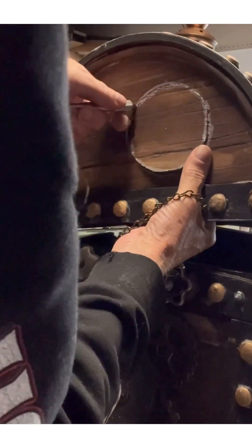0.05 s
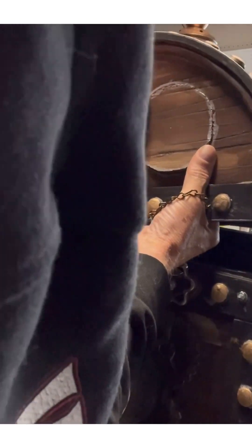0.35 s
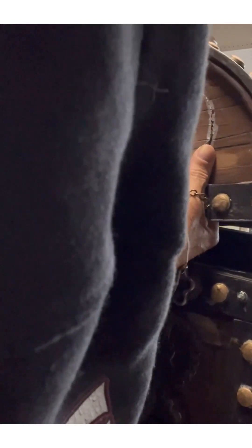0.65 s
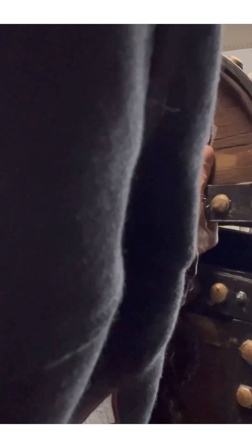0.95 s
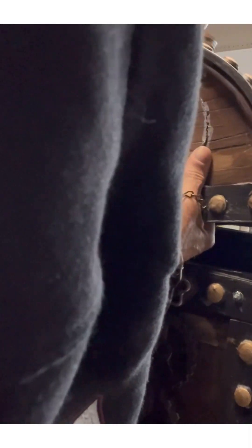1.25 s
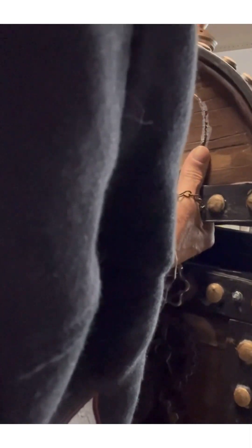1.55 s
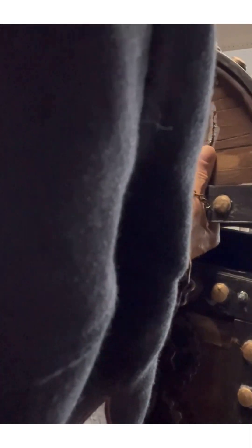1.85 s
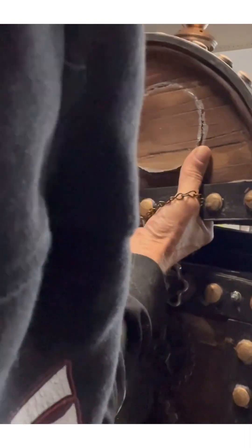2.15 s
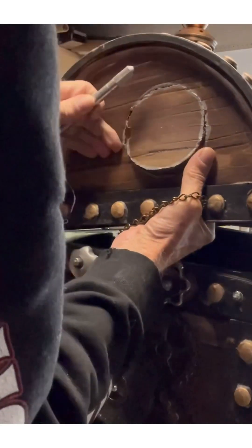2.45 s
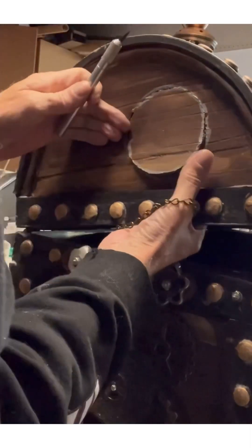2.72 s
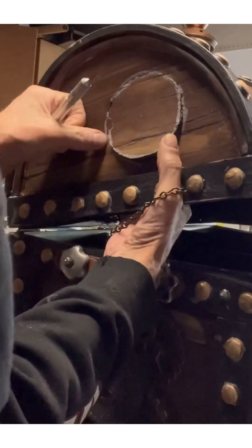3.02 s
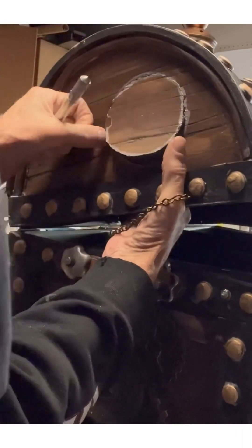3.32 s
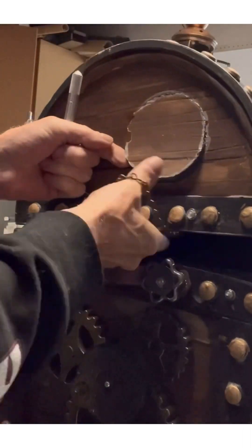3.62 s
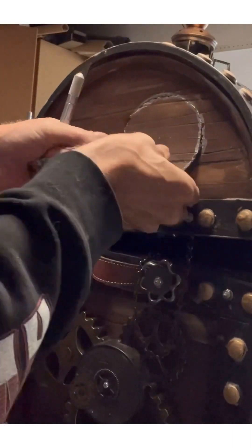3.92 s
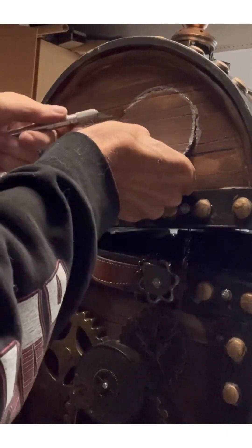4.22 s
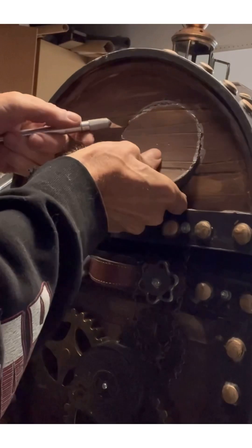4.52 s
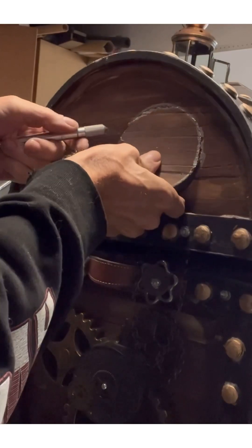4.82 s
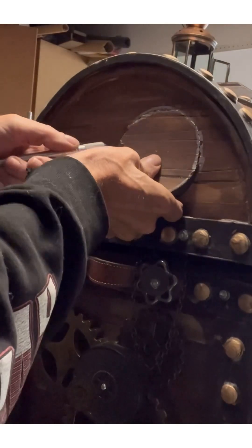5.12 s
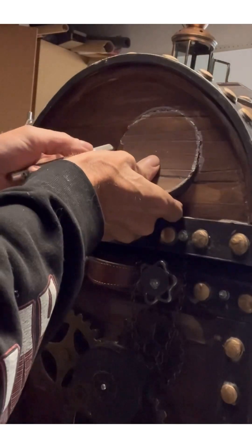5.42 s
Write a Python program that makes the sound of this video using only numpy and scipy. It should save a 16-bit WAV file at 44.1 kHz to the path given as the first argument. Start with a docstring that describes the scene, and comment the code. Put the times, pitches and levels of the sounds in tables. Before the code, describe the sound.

Close up in a quiet workshop, a steel point picks paint off a hollow prop with short, irregular scratches, crackly ticks and light knocks. The scraping pauses while a sleeve rustles and hands shift and bump on the surface, making two hard clacks. A small chain clinks and rattles briefly, then sparser ticks and scrapes resume. Very faint, high, falling squeaks pass twice in the background.

```python
"""Picking paint off a hollow prop

Close up in a quiet workshop, a steel point knocks, flicks off chips and drags in short strokes.
Blows and stick-slip ring the prop's modes; paint flakes crackle. A sleeve rustles, fingertips groan,
the grip shifts with two hard clacks and the links of a small chain collide.
Faint, high, falling squeaks come round twice."""
import sys
import numpy as np
from scipy import signal
from scipy.fft import rfft, irfft
from scipy.io import wavfile

SR = 44100
rng = np.random.default_rng(int(sys.argv[2]) if len(sys.argv) > 2 else 0)


def master(y):
    """Save y as 16-bit WAV."""
    cut = np.clip(np.atleast_2d(y).T, -1, 1)
    pcm = np.round(cut * 32767)  # scale
    wavfile.write(sys.argv[1], SR, pcm.astype(np.int16))


N = 249606
TIME_S = np.arange(N) / SR

# point catching on paint: t/s, body/dB, crack/dB
TICKS = [(0.0441, -53, -63), (0.0595, -46.5, -60), (0.267, -54.5, -82), (0.444, -74, -103),
         (0.639, -44, -54.5), (0.902, -47, -60.5), (1.184, -56.5, -69), (1.421, -78, -89),
         (2.0124, -45, -58.5), (2.116, -63, -114), (2.188, -68, -90), (2.288, -56.5, -68),
         (2.3083, -54, -62.5), (2.455, -59.5, -71), (2.6171, -36, -50.5), (2.641, -50.5, -60),
         (2.927, -62, -82), (3.083, -58.5, -67), (3.4559, -53, -65), (3.7255, -46, -63),
         (3.973, -62, -72.5), (4.0397, -56.5, -75), (4.1397, -58, -71), (4.433, -58, -77),
         (4.5427, -56, -83), (4.6447, -58, -66), (4.712, -64.5, -79), (4.7918, -61.5, -75.5),
         (4.9048, -64, -85.5), (4.9749, -60, -74.5), (5.005, -77, -88), (5.054, -69.5, -91),
         (5.4428, -60.5, -73.5), (5.5128, -40.5, -49), (5.5425, -45, -62), (5.6444, -59.5, -74.5)]
# blows: t/s, thump/dB, body/dB, crack/dB
KNOCKS = [(0.1127, -44, -44.5, -65.5), (0.3522, -42, -42.5, -61.5), (0.6745, -43.5, -41, -59.5),
          (0.9603, -47, -45.5, -63.5), (0.9990, -48.5, -50.5, -66.5), (1.8613, -42, -42.5, -62),
          (4.3195, -53, -40.5, -53), (4.3565, -53, -46.5, -66)]
BUMPS = [(2.422, -51.5, -59, -100), (3.214, -48.5, -47.5, -75), (3.541, -44, -42.5, -58),
         (3.606, -42, -38.5, -54), (3.845, -51, -55, -68.5), (4.301, -39.5, -52, -78)]
CLINKS = [(2.577, -63, -77, -73), (2.693, -74, -69, -69), (3.112, -66, -65, -66),
          (3.4966, -67.5, -62, -64.5), (3.689, -67.5, -52, -50.5), (3.71, -74, -57.5, -56.5),
          (3.7743, -67, -38.5, -39), (3.7812, -56, -32, -28), (3.8343, -71.5, -51.5, -48),
          (3.8765, -57, -50, -46.5), (3.8855, -75, -62, -49.5), (4.047, -57, -69, -56.5)]
CLACKS = [(3.1593, -41, -22.5, -42), (3.5983, -44, -25.5, -39.5)]
# thump, body and crack bands: low/Hz, high/Hz
CONTACT_BANDS = [(100, 450), (450, 2600), (2600, 16000)]
# strokes of the point: t/s, length/s, body/dB, grit/dB
STROKES = [(0.056, 0.042, -52, -68.5), (0.205, 0.043, -42, -61.5), (0.266, 0.059, -38, -51.5),
           (0.474, 0.06, -52.5, -67), (0.538, .085, -52, -74.5), (0.757, 0.05, -55, -67.5),
           (0.908, 0.052, -47, -61.5), (1.06, 0.052, -49, -56.5), (1.105, 0.067, -53.5, -66),
           (1.152, 0.052, -50.5, -58), (1.222, 0.058, -55.5, -74.5), (1.382, 0.051, -59.5, -75),
           (1.633, 0.053, -56.5, -64), (1.828, 0.035, -52, -63), (1.963, 0.05, -54.5, -66.5),
           (2.002, 0.034, -39.5, -49.5), (4.113, 0.047, -50.5, -59.5), (4.283, 0.039, -42.5, -48),
           (4.498, 0.04, -58, -67.5), (4.532, 0.046, -54, -61.5), (4.65, 0.037, -49.5, -75.5),
           (5.482, 0.03, -48.5, -64.5), (5.531, 0.037, -45, -56.5)]
# sleeve and hand sliding: t/s, length/s, rub/dB, hiss/dB
SLIDES = [(2.255, 0.18, -54, -65), (2.43, 0.15, -59.5, -66), (2.575, 0.096, -47.5, -59.5),
          (2.68, 0.071, -53.5, -61), (2.74, 0.068, -45.5, -58), (2.82, 0.098, -58, -66),
          (2.89, 0.16, -66, -70), (3.32, 0.1, -56, -63.5), (3.45, 0.11, -47.5, -56.5),
          (3.475, 0.23, -46, -56), (3.59, 0.082, -46.5, -44), (3.65, .16, -48.5, -52.5),
          (3.785, 0.1, -51.5, -64.5), (3.86, 0.07, -56, -57.5), (3.95, 0.15, -66, -73),
          (4.14, .15, -60.5, -64.5), (4.36, 0.16, -60, -71)]
# resting point, fingertips, chain in motion: t/s, length/s, level/dB
CREEPS = [(0.15, 0.37, -57), (0.95, 0.66, -71.5), (1.9, 0.68, -69), (2.75, .35, -69), (4.38, 1, -73)]
DRAGS = [(2.565, 0.095, -48), (3.055, 0.2, -58.5), (3.455, 0.065, -44)]
RATTLES = [(3.6, .32, -58.5)]
# one run of squeaks: t/s, length/s, start f/Hz, end f/Hz, width/Hz, relative level/dB
SQUEAKS = [(1.156, 0.063, 10200, 9700, 340, -66.5), (1.199, 0.079, 10600, 9500, 1300, -72.5),
           (1.264, 0.088, 12300, 9900, 1700, -70), (1.303, 0.15, 9200, 8600, 1000, -77.5),
           (1.354, 0.09, 8800, 8660, 340, -68.5), (1.456, 0.093, 14000, 8000, 2700, -70.5),
           (1.693, 0.14, 13300, 11100, 2600, -83.5)]
# resonances of prop, chain and sleeve crease: f/Hz, width/Hz, gain/dB
SKIN_MODES = [(151.3, 70, -6.5), (356.7, 45, 4), (531, 80, -1), (727, 120, 1.5), (845, 74, 1.5),
              (1030.5, 50, -1.5), (1272, 120, -4), (1492, 100, -4), (1700, 130, -5), (2256, 370, -10),
              (3150, 660, -10), (4200, 2800, -14), (13000, 3000, -25.5)]
PANEL_MODES = [(150.6, 16, -6), (284, 44, -6.5), (362.3, 132, 4), (362, 48, 8), (476, 55, -0.5),
               (550, 115, 1.5), (722, 87, 1.5), (765, 88, 2), (966, 73, -11), (1156, 50, -10),
               (1650, 150, -17), (2180, 410, -17.5), (4000, 2600, -22)]
FRAME_MODES = [(98, 29, -19), (143, 17, -3), (247, 42, -3.5), (292.3, 36, -4), (520, 87, 4), (843, 120, -5),
               (1200, 800, -26.5), (2160, 800, -21.5), (5250, 5400, -31.5)]
SHELL_MODES = [(152, 22, -16), (320, 200, -10), (510, 190, -6), (780, 200, 2.5), (1003, 90, -8),
               (1235, 230, 0), (1700, 550, -9.5), (2200, 500, -11.5), (3080, 200, -21), (5300, 2200, -26),
               (13500, 5000, -33)]
CHAIN_MODES = [(377, 140, -16.5), (745, 190, -4.5), (1211.4, 110, -2.5), (1830, 370, -7.5), (3190, 110, -3),
               (3560, 440, -10.5), (4800, 700, -9.5), (5430, 220, -1.5), (6380, 400, -8.5),
               (7380, 260, -4.5), (8350, 220, -3.5), (10990, 200, -2), (12300, 5500, -5.5),
               (13700, 1000, 0)]
CREASE_MODES = [(1600, 600, -1), (2400, 170, 2.5), (3220, 600, -3), (5000, 1600, -7.5)]
# spectra of room air, hand rub, cloth hiss, paint flakes: f/Hz, relative level/dB
ROOM_SPECTRUM = [(25, -47), (60, -30), (100, -12), (155, 2), (230, -2.5), (400, -7.5), (760, -13),
                 (1100, -16.5), (2000, -22), (4000, -27), (8000, -33.5), (13000, -30.5), (16000, -69)]
RUB_SPECTRUM = [(60, -27.5), (150, -12.5), (260, -5), (480, -4), (780, -4), (1000, -6.5), (1400, -7),
                (2200, -14), (3200, -32.5)]
HISS_SPECTRUM = [(1800, -20.5), (3000, -1.5), (5000, -6), (8000, -10), (12000, -3), (16000, -10)]
FLAKE_SPECTRUM = [(1900, -12), (2900, -2), (4800, 0), (7000, -6), (10000, -9), (16000, -11)]


def from_db(db):
    return 10 ** (np.asarray(db) / 20)


def rms_one(x):
    return x / np.sqrt(np.mean(x ** 2) + 1e-20)


def band(x, edges_hz, order):
    """Causal band-pass."""
    sos = signal.butter(order, np.clip(edges_hz, 10, .45 * SR), "band", fs=SR, output="sos")
    return signal.sosfilt(sos, x)


def colour(x, spectrum):
    """Smooth spectral shaping, both ends rolled off; rms 1."""
    hz, db = np.transpose(spectrum)
    f = np.fft.rfftfreq(N, 1 / SR) + 1
    rolloff = 1 / (1 + (f / hz[-1] / 2) ** 4) / (1 + (hz[0] / f / 2) ** 4)
    gain = from_db(np.interp(np.log(f), np.log(hz), db))
    return rms_one(irfft(rfft(x) * rolloff * gain, N))


def drift(rate_hz):
    """Random wander; rms 1."""
    knots = rng.standard_normal(int(rate_hz * N / SR) + 2)
    return rms_one(np.interp(TIME_S * rate_hz, np.arange(len(knots)), knots))


def resonate(x, modes):
    """Parallel resonances of alternating sign."""
    out = 0
    for k, (hz, width_hz, db) in enumerate(modes):
        r = np.exp(-np.pi * width_hz / SR)
        poles = [1, -(1 + r * r) * np.cos(2 * np.pi * hz / SR), r * r]
        gain = (-1) ** k * from_db(db) * (1 - r * r) / 2
        out = out + gain * signal.lfilter([1, 0, -1], poles, x + 1e-18)
    return out


def disperse(x, delay_s):
    """Bending waves: delay goes as 1/sqrt(f), so blows chirp down. delay_s sets the scale at 1 kHz."""
    f = np.fft.rfftfreq(2 * len(x), 1 / SR)
    cycles = delay_s * (2 * np.sqrt(1000 * f) - f / np.sqrt(12))   # zero delay at 12 kHz
    return irfft(rfft(x, 2 * len(x)) * np.exp(-2j * np.pi * cycles))[:len(x)]


def grains(per_s, spread_db, clump_db, clump_hz):
    """Tiny slips of uneven size, in clumps; rms 1."""
    sizes = from_db(spread_db * np.minimum(rng.exponential(1, N), 4)) * rng.choice([-1, 1], N)
    hits = rng.random(N) < per_s / SR
    return rms_one(sizes * hits * from_db(clump_db * drift(clump_hz)))


def swells(rows, peak_share, edge_db, curve):
    """One gain curve per level column; each movement peaks once, at edge_db on both ends."""
    power = np.zeros((len(rows[0]) - 2, N))
    for start_s, length_s, *levels_db in rows:
        near = slice(*np.searchsorted(TIME_S, [start_s - length_s, start_s + 2 * length_s]))
        offset = (TIME_S[near] - start_s) / length_s - peak_share
        from_peak = np.maximum(-offset / peak_share, offset / (1 - peak_share))
        power[:, near] += np.outer(from_db(levels_db), from_db(edge_db * from_peak ** curve)) ** 2
    return np.sqrt(power)


def contacts(rows, modes, delay_s, scatter_db, scatter_t60_s, hard_db):
    """Each blow and its edge reflections ring the modes; thump, body and crack are set per band."""
    size, lead = SR // 5, SR // 100
    t, f = np.arange(size) / SR, np.fft.rfftfreq(size, 1 / SR) + 1
    log_corners = np.log(np.array(CONTACT_BANDS) * [1.15, 1 / 1.15]).ravel()
    out = np.zeros(N + size)
    for (start_s, *levels_db), noise in zip(rows, rng.standard_normal((len(rows), size))):
        scatter = noise * from_db(-60 * t / scatter_t60_s) * (1 - np.exp(-t / .00041))
        force = (t == 0) + from_db(scatter_db) * scatter / np.linalg.norm(scatter)
        # a light touch lasts longer and loses its top
        top_hz = np.clip(16000 * from_db((levels_db[-1] - hard_db) / 2), 4500, 18000)
        force = band(force, [85, top_hz], order=2)
        travel_s = delay_s * (1 + .2 * np.tanh(noise[-1]))   # distance to the edge varies
        ringing = disperse(resonate(force, modes), travel_s)
        spectrum = rfft(np.roll(ringing, lead))
        energy = [2 * np.sum(abs(spectrum[(f > lo) & (f < hi)]) ** 2) / size for lo, hi in CONTACT_BANDS]
        band_db = 10 * np.log10(np.array(energy) / (.025 * SR))   # as power over 25 ms
        tilt_db = np.interp(np.log(f), log_corners, np.repeat(levels_db - band_db, 2))
        at = int(start_s * SR) - lead
        out[at:at + size] += irfft(spectrum * from_db(tilt_db), size)
    return out[:N]


def room_tone(mid_db=-73.5):
    """Still workshop air, mostly alike on both sides."""
    mid, side = (colour(noise, ROOM_SPECTRUM) for noise in rng.standard_normal((2, N)))
    return from_db(mid_db) * (mid + from_db(-3) * side * [[1], [-1]])


def point_ticks(thump_re_body_db=-10):
    """The point catches on paint, too lightly to move the panel much."""
    rows = [(start_s, body_db + thump_re_body_db, body_db, crack_db)
            for start_s, body_db, crack_db in TICKS]
    return contacts(rows, SKIN_MODES, delay_s=.001, scatter_db=-2.5, scatter_t60_s=.04, hard_db=-53)


def scratching():
    """Pressure builds, then the point lifts; its slips ring the prop's skin and flakes crackle."""
    body, grit = swells(STROKES, peak_share=.59, edge_db=-20, curve=1.17)
    slips = grains(per_s=4000, spread_db=3.2, clump_db=2.4, clump_hz=200)
    ringing = disperse(resonate(slips, SKIN_MODES), delay_s=.001)
    skin = rms_one(band(ringing, [420, 2500], order=4))
    return body * skin + grit * colour(slips, FLAKE_SPECTRUM)


def point_knocks():
    """The point is set down and rings the panel."""
    return contacts(KNOCKS, PANEL_MODES, delay_s=.0022, scatter_db=-4, scatter_t60_s=.08, hard_db=-44)


def creeping():
    """Stray soft slips of the resting point ring the prop's skin."""
    level, = swells(CREEPS, peak_share=.5, edge_db=-10, curve=4)
    taps = grains(per_s=20, spread_db=1.5, clump_db=1, clump_hz=10)
    return level * rms_one(band(resonate(taps, SKIN_MODES), [260, 1000], order=2))


def squeaks(repeat_s=2.96):
    """Narrow, unsteady whistles slide down; the run returns once, fainter."""
    out = np.zeros(N)
    for offset_s, run_db in ((0, -1.5), (repeat_s, -4)):
        for start_s, length_s, from_hz, to_hz, width_hz, db in SQUEAKS:
            progress = np.linspace(0, 1, int(length_s * SR))
            size = len(progress)
            noise = rng.standard_normal(size) + 1j * rng.standard_normal(size)
            waver = signal.sosfilt(signal.butter(2, width_hz / 2, fs=SR, output="sos"), noise)
            phase = 2 * np.pi * np.cumsum(from_hz + (to_hz - from_hz) * progress) / SR
            whistle = (waver * np.exp(1j * phase)).real * np.sin(np.pi * progress)
            at = int((start_s + offset_s) * SR)
            out[at:at + size] += from_db(db + run_db) * rms_one(whistle)
    return out * from_db([[-4], [.5]])   # left, right


def sleeve(crease_re_hiss_db=-4):
    """Cloth and hand slide in dense grains as the arm speeds up and slows; creases snap."""
    rub, hiss = swells(SLIDES, peak_share=.53, edge_db=-15.5, curve=1.8)
    fibres = grains(per_s=6000, spread_db=3.6, clump_db=2.2, clump_hz=200)
    hand = grains(per_s=5000, spread_db=2.5, clump_db=2.6, clump_hz=120)
    snaps = grains(per_s=110, spread_db=2.5, clump_db=1.5, clump_hz=40)
    creases = rms_one(band(resonate(snaps, CREASE_MODES), [900, 12000], order=1))
    cloth = colour(fibres, HISS_SPECTRUM) + from_db(crease_re_hiss_db) * creases
    return rub * colour(hand, RUB_SPECTRUM) + hiss * cloth


def hand_bumps():
    """A hand lands on the prop and rings its frame."""
    return contacts(BUMPS, FRAME_MODES, delay_s=.0012, scatter_db=-1, scatter_t60_s=.07, hard_db=-33)


def fingertips():
    """Fingertips stick and slip; the frame groans."""
    level, = swells(DRAGS, peak_share=.55, edge_db=-12, curve=3)
    slips = grains(per_s=900, spread_db=1.5, clump_db=1.5, clump_hz=80)
    return level * rms_one(band(resonate(slips, FRAME_MODES), [380, 1500], order=2))


def chain_clinks():
    """Single links collide and ring."""
    return contacts(CLINKS, CHAIN_MODES, delay_s=.00018, scatter_db=9, scatter_t60_s=.037, hard_db=-80)


def grip_clacks():
    """Hard blows ring the shell as the grip shifts."""
    return contacts(CLACKS, SHELL_MODES, delay_s=.0006, scatter_db=-7, scatter_t60_s=.043, hard_db=-42)


def chain_rattle():
    """The chain runs off the hand; loose links tumble and ring."""
    level, = swells(RATTLES, peak_share=.55, edge_db=-14, curve=3)
    touches = grains(per_s=350, spread_db=3, clump_db=2, clump_hz=60)
    return level * rms_one(resonate(touches, CHAIN_MODES))


def from_right(x, tilt_db, lag_samples, shadow_hz=190):
    """Source on the right: left lags; above the bass, right gains tilt_db and left loses it."""
    f = np.fft.rfftfreq(N, 1 / SR)
    gain = from_db(tilt_db * f ** 2 / (f ** 2 + shadow_hz ** 2))
    lag = np.exp(-2j * np.pi * f * lag_samples / SR)
    return irfft(rfft(x) * np.array([lag / gain, gain]), N)


def reflections(x, edges_hz, gap_s, length_s, t60_s, wet_db):
    """Dense decaying echoes, different at each microphone."""
    t = np.arange(int(length_s * SR)) / SR
    noise = band(rng.standard_normal((2, len(t))), edges_hz, order=1)
    tails = noise * from_db(-60 * t / t60_s) * (t > gap_s)
    tails /= np.linalg.norm(tails, axis=1, keepdims=True)
    return from_db(wet_db) * signal.oaconvolve(x[None], tails, axes=1)[:, :N]


def scene():
    """Prop, arm and chain, each in its place, in the still workshop."""
    knocks, bumps, ticks = point_knocks(), hand_bumps(), point_ticks()
    clacks, clinks = grip_clacks(), chain_clinks()
    on_prop = [knocks, bumps + fingertips(), ticks, clacks, scratching() + creeping()]
    arm, chain = sleeve(), clinks + chain_rattle()
    sources = on_prop + [arm, chain]
    direct = (from_right(sum(on_prop), tilt_db=4.7, lag_samples=2.68)
              + from_right(arm, tilt_db=3.8, lag_samples=1.8)
              + from_right(chain, tilt_db=2, lag_samples=1.15))
    # off arms and prop, separate paths per source
    early = sum(reflections(source, [250, 15000], gap_s=.0005, length_s=.05, t60_s=.03, wet_db=-15)
                for source in sources)
    room_tail = reflections(sum(sources), [110, 5000], gap_s=.006, length_s=.5, t60_s=.1, wet_db=-16.5)
    return direct + early + room_tail + squeaks() + room_tone()


def record(dry):
    """Steep low-pass."""
    cutoff_hz = 16300
    return signal.sosfilt(signal.ellip(10, .1, 70, cutoff_hz, fs=SR, output="sos"), dry)


dry = scene()
out = record(dry)
master(out)
```